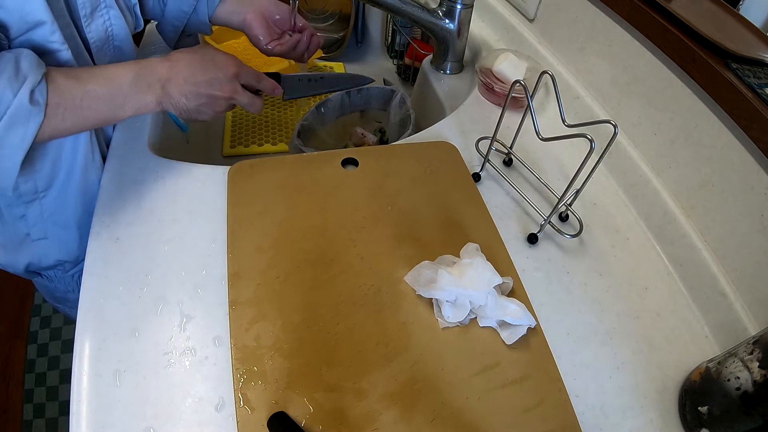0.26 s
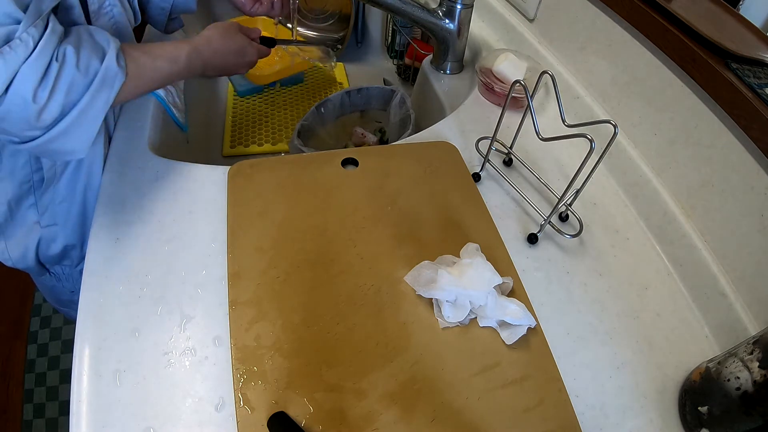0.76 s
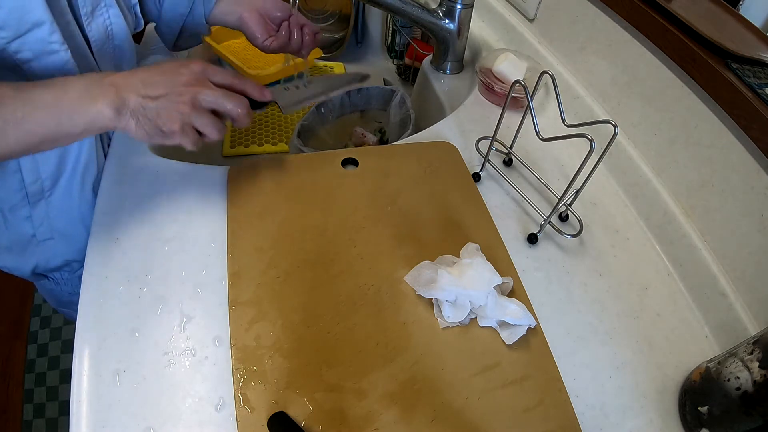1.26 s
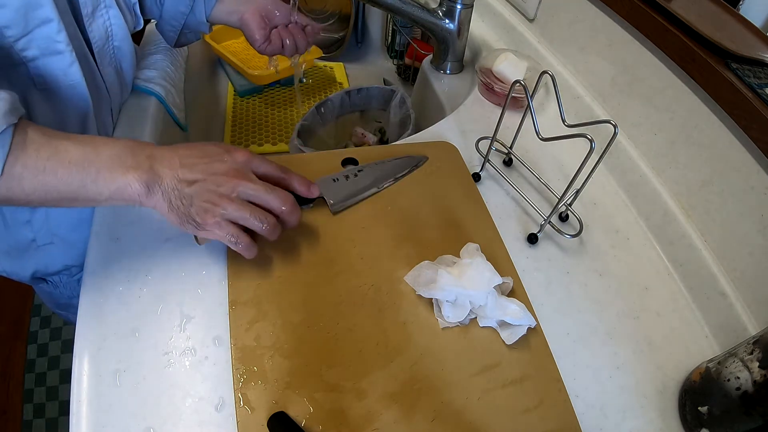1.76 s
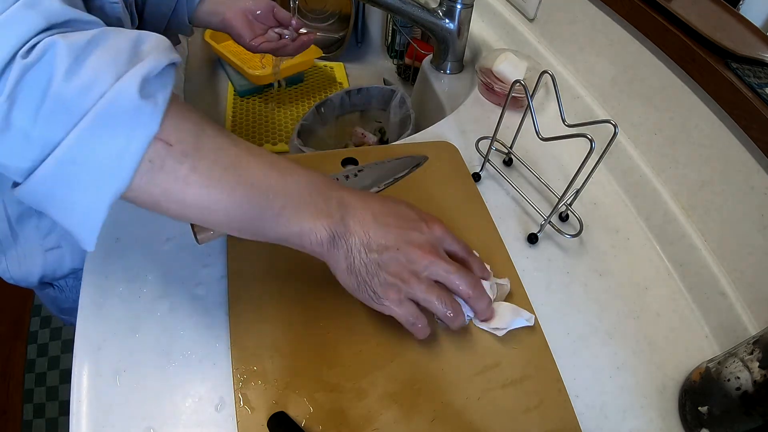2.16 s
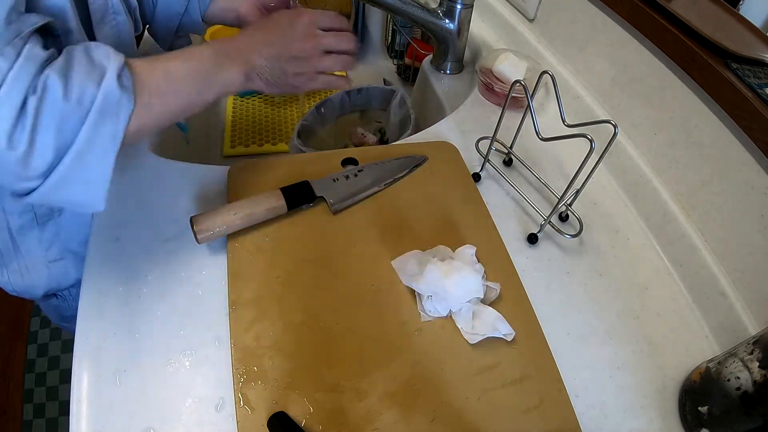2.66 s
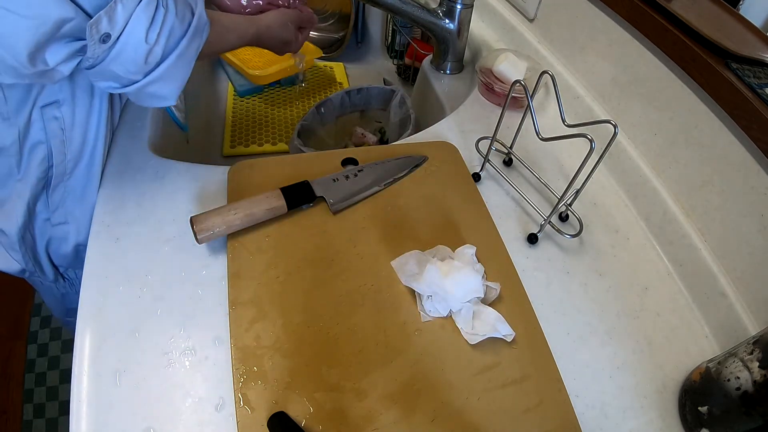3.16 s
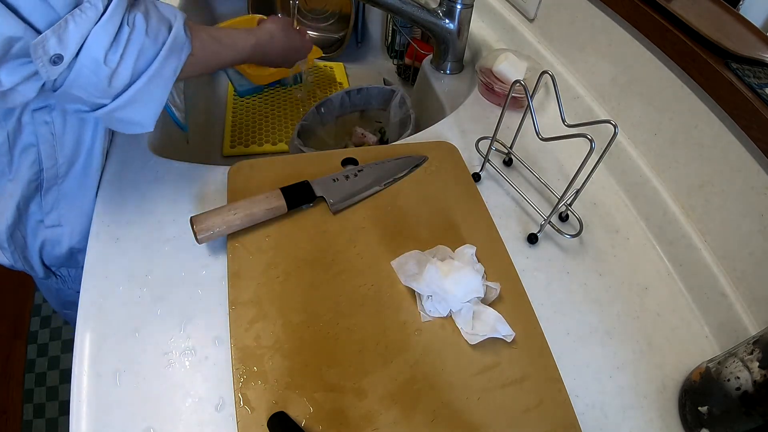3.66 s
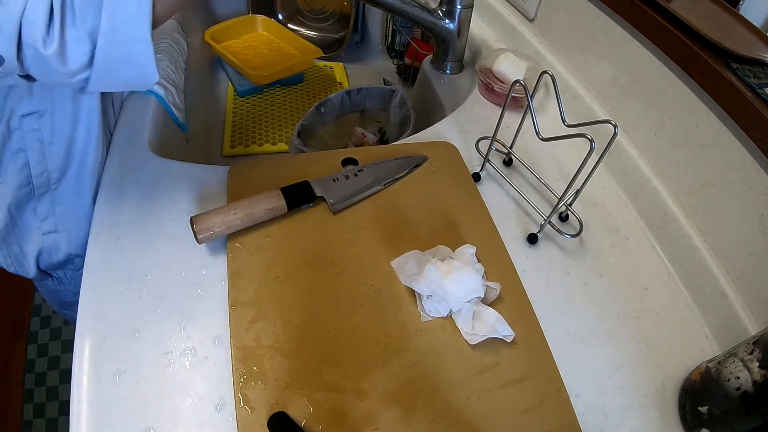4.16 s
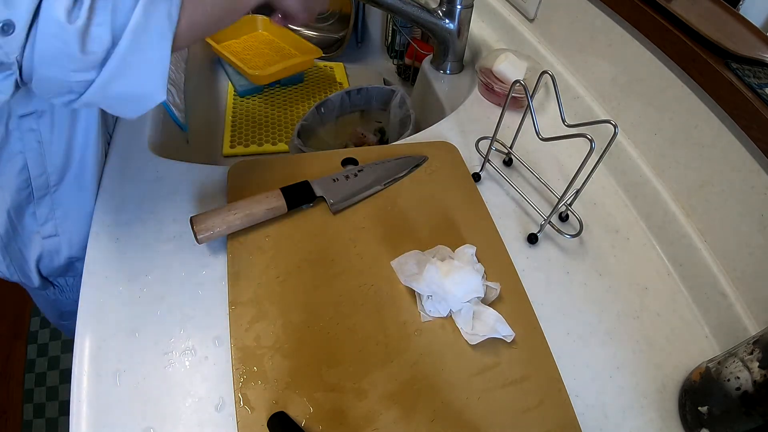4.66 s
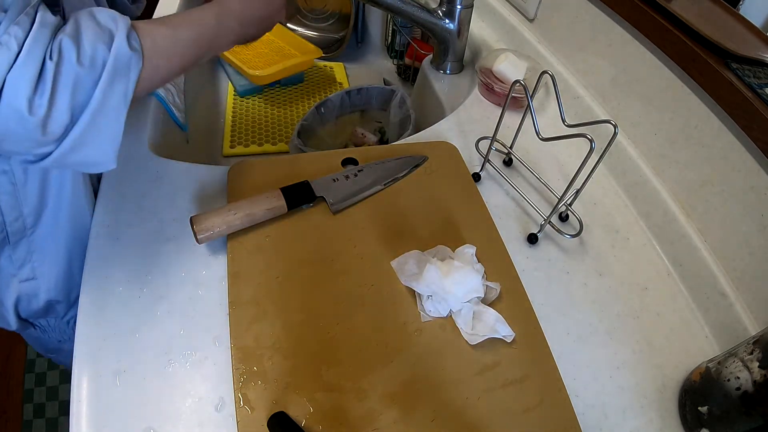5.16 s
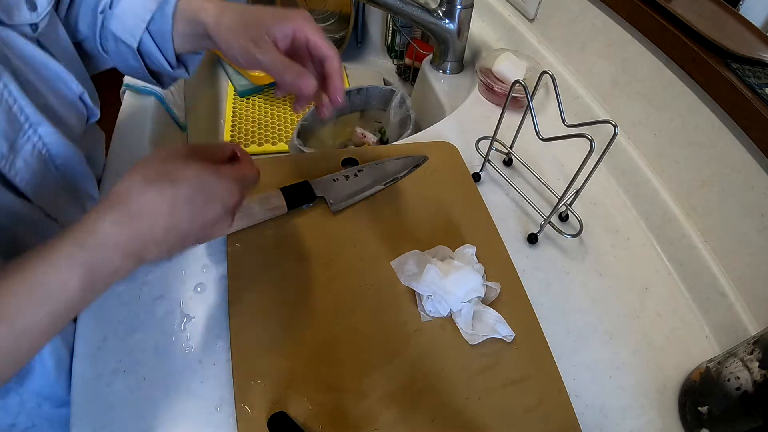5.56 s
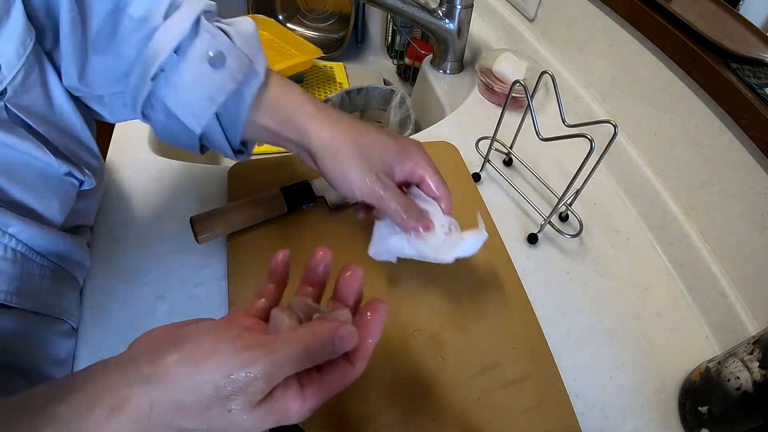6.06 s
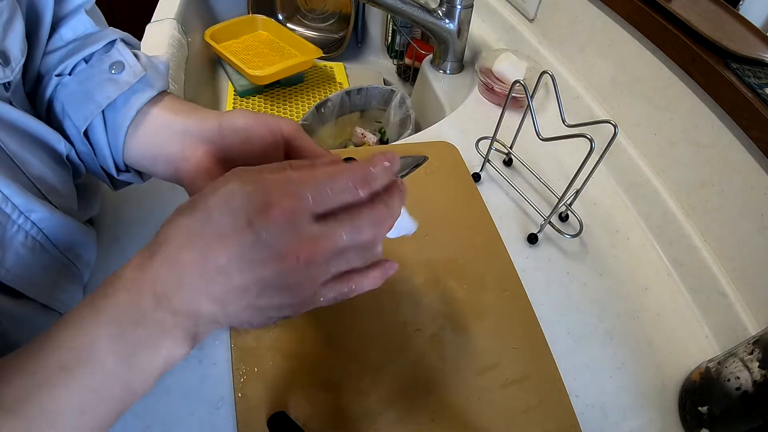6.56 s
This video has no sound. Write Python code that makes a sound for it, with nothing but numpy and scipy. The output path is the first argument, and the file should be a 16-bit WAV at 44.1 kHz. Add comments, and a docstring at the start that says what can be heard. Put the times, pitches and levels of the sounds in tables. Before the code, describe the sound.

Tap water splatters in a sink, a knife knocks down and rocks on a board, the tap shuts with a thud, then wet hands rustle and tap.

```python
"""A tap runs over a knife and hands into a sink: noise grains and bubble pings, filtered by spectra.
The knife is laid on a board and rocks to rest: damped modes. Wet hands then squeak briefly.
The valve sings (narrow noise) and shuts with a clunk and deep thud (low modes); the spout dribbles dry.
Wet hands tap and squeak about the sink, press on the counter and pick up a paper towel in a quiet room.
A limiter ducks the whole mix at loud blows and recovers slowly."""
import sys
import numpy as np
from scipy import signal
from scipy.fft import rfft, irfft
from scipy.io import wavfile
from scipy.ndimage import uniform_filter1d

SR = 44100
rng = np.random.default_rng(int(sys.argv[2]) if len(sys.argv) > 2 else 0)


def store_pcm(level_fs):
    """Save levels as 16-bit WAV."""
    pcm = np.round(np.clip(level_fs, -1, 1) * 32767).astype(np.int16)
    wavfile.write(sys.argv[1], SR, np.atleast_2d(pcm).T)


N = 301197
TIME, BINS = np.arange(N) / SR, np.fft.rfftfreq(8192, 1 / SR)
AGE = TIME[:SR // 2]  # time since the start of a single event
SHUT_S, CLOSE_DB_PER_S = 3.945, 184  # the valve shuts; how fast the flow dies
# spectrum of the drumming sink floor: hz, level_db
DRUM_TONE = [(30, -47), (60, -11), (85, -20.5), (110, -35.5), (150, -2.5), (170, 1.5), (215, -10.5),
             (265, -2.5), (320, -15.5), (450, -17)]


def amp(db):
    """Decibels to gain."""
    return 10 ** (np.asarray(db) / 20)


def unit(x):
    """Scales to rms 1."""
    return x / np.sqrt(np.mean(x ** 2) + 1e-20)


def tone(points):
    """A spectrum in dB on the filter bins, falling 30 dB per octave more beyond its ends."""
    hz, db = np.transpose(points)
    octave, known = np.log2(BINS + 1), np.log2(hz + 1)
    beyond = abs(octave - np.clip(octave, known[0], known[-1]))
    return np.interp(octave, known, db) - 30 * beyond


def colour(x, db, band):
    """Minimum-phase filter that gives unit white noise an rms of 1 inside the band."""
    gain = amp(np.maximum(db - db.max(), -90))
    gain = gain / np.sqrt(np.mean(gain ** 2 * (BINS > band[0]) * (BINS < band[1])))
    log_gain = np.log(np.r_[gain, gain[-2:0:-1]])
    response = np.exp(np.conj(signal.hilbert(log_gain)))
    impulse = np.fft.ifft(response).real[:len(BINS)]
    return signal.oaconvolve(np.atleast_2d(x), impulse[None], axes=1)[:, :N]


def ear_noise(length, same):
    """White noise for two ears; same is the share of power they hear alike."""
    z = rng.standard_normal((3, length))
    return np.sqrt(same) * z[0] + np.sqrt(1 - same) * z[1:]


def burst(lo_hz, hi_hz, same=0.99):
    """Half a second of band noise at rms 1, partly shared by both ears."""
    sos = signal.butter(3, [lo_hz, min(hi_hz, .48 * SR)], "band", fs=SR, output="sos")
    return unit(signal.sosfilt(sos, ear_noise(len(AGE), same)))


def decay(t60_s):
    """Exponential fall of 60 dB in t60_s."""
    return np.exp(-np.log(1000) * AGE / t60_s)


def attack(rise_s):
    """Linear rise from 0 to 1."""
    return np.minimum(AGE / rise_s, 1)


def pan(db):
    """Left and right gains for a left-right level difference; the nearer ear has gain 1."""
    return amp([[min(db, 0)], [min(-db, 0)]])


def add(mix, s, sound):
    """Mixes a sound in at time s."""
    part = mix[:, round(s * SR):][:, :sound.shape[-1]]
    part += sound[..., :part.shape[1]]


def flutter(hz, depth_db):
    """A random gain that wanders mostly below hz, by depth_db rms."""
    lowpass = 1 / (1 + (np.fft.rfftfreq(N, 1 / SR) / hz) ** 4)
    slow = irfft(rfft(rng.standard_normal(N)) * lowpass, N)
    return amp(depth_db * unit(slow))


def held(s, length_s, rise_db_per_s, fall_db_per_s):
    """Gain that climbs to 1 at time s, holds for length_s and dies away."""
    early_s = np.maximum(s - TIME, 0)
    late_s = np.maximum(TIME - s - length_s, 0)
    return amp(-rise_db_per_s * early_s - fall_db_per_s * late_s)


def patter(per_s, spread_db, channels=1):
    """Tiny impacts at random moments, a few much larger than the rest, at rms 1."""
    shape = (channels, N)
    size = amp(spread_db * np.minimum(rng.exponential(1, shape), 5))
    struck = rng.random(shape) < per_s / SR
    return unit(size * rng.standard_normal(shape) * struck)


def bubbles(per_s, spread_db, cycles, lo_hz, hi_hz, count=24):
    """Bubbles burst at random, each a short, slightly rising ping at one of count pitches."""
    out, t = np.zeros(N), AGE[:1500]
    for hz in np.geomspace(lo_hz, hi_hz, count):
        life = t * hz / cycles
        ping = np.sin(2 * np.pi * hz * t * (1 + 0.013 * life)) * np.exp(-life)
        out += unit(signal.oaconvolve(patter(per_s / count, spread_db)[0], ping)[:N])
    return unit(out)


def ringing(modes):
    """One strike on a set of modes, each with a chance strength and phase in either ear."""
    hz, db, t60_s = np.transpose(modes)[:, :, None]
    phase = rng.random((2, len(modes), 1))
    spread_db = 4.6 * rng.standard_normal((2, len(modes), 1))
    ring = (amp(db + spread_db) * np.sin(2 * np.pi * (hz * AGE + phase)) * decay(t60_s)).sum(1)
    return ring / np.sqrt(np.sum(amp(db) ** 2)) * attack(0.00085)


def favoured(modes, hz):
    """The place of contact brings out the modes near hz."""
    boost_db, width = 12.5, 0.2  # width on a natural-log frequency scale
    return [(f, db + boost_db * np.exp(-(np.log(f / hz) / width) ** 2), t60_s) for f, db, t60_s in modes]


def kitchen(x, t60_s, wet_db):
    """Adds the short diffuse echo of a small room."""
    tail = burst(190, 11000, same=1.0) * decay(t60_s) * (AGE > .004)
    tail = tail / np.linalg.norm(tail[0])
    return x + amp(wet_db) * signal.oaconvolve(x, tail, axes=1)[:, :N]


def room_air():
    """The quiet kitchen's steady rush, with a thin high hiss: two filtered noises."""
    # spectrum of the rush: hz, level_db
    room_tone = [(25, 8), (60, 20.5), (100, 11), (170, -3), (260, -7.5), (350, 10.5), (560, -6),
                 (740, 10.5), (1000, -10.5), (1500, -15), (2500, -17), (4500, -4.5), (8000, -16),
                 (11000, -20), (15500, -29)]
    # spectrum of the hiss: hz, level_db
    hiss_tone = [(4500, -35.5), (5500, -4), (6200, 1.5), (6800, -0.5), (7800, -6.5), (9500, -40.5)]
    rush = amp(-77) * colour(ear_noise(N, 0.99), tone(room_tone), (600, 4000))
    hiss = amp(-81.0) * colour(rng.standard_normal((2, N)), tone(hiss_tone), (5000, 8000))
    return rush + hiss * pan(-12.0)


def strokes():
    """Gains of rustling, rubbing and bumping over time: each stroke swells, holds and fades."""
    # strokes of wet hands and paper: start_s, length_s, rustle_db, rub_db, bump_db
    stroke_rows = [(2.442, 0.0083, -87, -60, -66), (4.469, 0.042, -69.5, -61.5, -49),
                   (4.84, 0.2, -73, -59, -57), (5.07, 0.33, -70.5, -65.5, -57),
                   (5.542, 0.063, -66, -60.5, -50), (5.715, 0.06, -66.5, -69, -53),
                   (5.903, 0.16, -64, -61.5, -47.5), (6.292, 0.09, -70, -62.5, -73),
                   (6.561, 0.19, -68.5, -62.5, -57)]
    rise_db_per_s, fall_db_per_s = 217, 138
    shapes = np.array([held(s, length_s, rise_db_per_s, fall_db_per_s) for s, length_s, *_ in stroke_rows])
    return amp(np.array(stroke_rows)[:, 2:]).T @ shapes


def handling():
    """Sleeves and damp paper rustle in fine grains while the hands rub and bump along the counter."""
    # spectrum of the rustle: hz, level_db
    rustle_tone = [(550, 5), (800, 6), (1100, -2), (1600, 1), (2000, -3.5), (2400, -2.5), (2850, -8),
                   (4400, -9), (5200, -5.5), (6400, -1), (8000, -19.5), (11000, -25.5), (15000, -34)]
    # spectrum of the hollow rubbing: hz, level_db
    rub_tone = [(250, -49.5), (380, 0.5), (436, 5.5), (490, -2.5), (600, -8.5), (900, -41)]
    # spectrum of the low bumping: hz, level_db
    bump_tone = [(40, 4), (100, -24), (160, 6), (215, -1.5), (275, 1.5), (350, -17), (600, -28)]
    hands_s, sleeve_db, bump_db = 4.1, -74.5, -56.5  # steady movement from hands_s on
    snaps = amp(-26.5) * patter(120, 6)  # damp paper and skin
    grains = patter(3000, 0.87, channels=2) * flutter(30, 0.93) + snaps
    rustle = colour(grains, tone(rustle_tone), (1200, 4500))
    rub = colour(patter(600, 0.3, channels=2), tone(rub_tone), (350, 600))
    bump = colour(patter(400, 0.48, channels=2), tone(bump_tone), (130, 320)) * pan(-3)
    moving = held(hands_s, 0, 217, 0)
    rustling, rubbing, bumping = strokes()
    out = rustle * np.hypot(rustling, amp(sleeve_db) * moving)
    out = out + rub * rubbing
    out = out + bump * np.hypot(bumping, amp(bump_db) * moving)
    return out * pan(-1.75)


def smacks():
    """A wet fingertip lands with a short, dull slap of band noise."""
    # touch-downs of wet fingers: start_s, level_db
    smack_rows = [(4.793, -55), (4.83, -50), (4.886, -52.5), (5.128, -50), (5.925, -47), (6.0, -54),
                  (6.551, -57.5), (6.653, -47.5), (6.669, -47)]
    out = np.zeros((2, N))
    for s, db in smack_rows:
        add(out, s, amp(db) * burst(700, 1600, same=0.04) * decay(0.027))
    return out


def squeaks():
    """Wet skin sticks and slips: six falling harmonics of a jittering pitch."""
    # squeaks of wet skin: start_s, length_s, level_db, pitch_hz
    squeak_rows = [(2.588, 0.039, -34.5, 439), (2.612, 0.035, -37.5, 423.5), (4.83, 0.024, -41.5, 441),
                   (4.885, 0.03, -34, 437)]
    out = np.zeros((2, N))
    for s, length_s, db, hz in squeak_rows:
        jitter = 1 + 0.093 * burst(29, 158, same=0.94)[0]
        turn = 2 * np.pi * np.cumsum(hz * jitter) / SR
        slips = sum(np.sin(k * turn) * amp(-16 * np.log2(k)) for k in range(1, 7))
        gate = np.clip(np.minimum(AGE / 0.00072, (length_s - AGE) / 0.0043), 0, 1)
        add(out, s, amp(db) * slips * gate * decay(0.16))
    return out


def skitter(ring, count=5):
    """A tap is not one clean contact: a few lighter touches follow and make its ring uneven."""
    within_s, touch_db = 0.025, -15
    out = np.atleast_2d(ring).copy()
    for when, size in rng.random((count, 2)):
        add(out, within_s * when, amp(touch_db) * size * ring)
    return unit(out) * ring.std()


def taps():
    """Light taps ring the hollow sink and its metal, whose ring wavers like a rattle."""
    # taps, levels before fixed offsets: start_s, hollow_db, bright_db, favoured_hz
    tap_rows = [(4.416, -61, -76, 5500), (4.791, -61.5, -64, 4500), (5.051, -63, -54.5, 2620),
                (5.066, -53.5, -61, 3020), (5.146, -50, -52, 5700), (5.239, -55.5, -62, 5870),
                (5.27, -51.5, -54, 3730), (5.515, -76, -68, 2350), (5.546, -59.5, -69, 4270),
                (5.586, -55, -63, 3300), (5.756, -53.5, -63, 2350), (5.925, -56.5, -57.5, 2320),
                (5.988, -62, -57, 2400), (6.045, -52, -61.5, 2400), (6.26, -64.5, -57.5, 2280),
                (6.327, -76, -66.5, 4370), (6.552, -55, -80, 4400), (6.653, -53, -62, 4460),
                (6.711, -56, -64.5, 6000)]
    # modes of the hollow body: pitch_hz, level_db, t60_s
    hollow = [(383, 3.5, 0.086), (437.8, 10.5, 0.17), (472.6, 1.5, 0.21), (767, -11.5, 0.14),
              (852, -5.5, 0.3), (1070, -23, 0.05), (1270, -14.5, 0.29), (1560, -12.5, 0.12)]
    # modes of the bright metal: pitch_hz, level_db, t60_s
    metal = [(2170, -4, 0.06), (2274, 2, 0.14), (2366, 2, 0.076), (2460, -7, 0.05), (2960, -2, 0.1),
             (3078, 3, 0.093), (3400, -7, 0.06), (4200, 2, 0.07), (4550, -2, 0.05), (5060, -3, 0.07),
             (5790, 0, 0.06), (5997, 2.5, 0.11)]
    out = np.zeros((2, N))
    for s, body_db, bright_db, hz in tap_rows:
        tick = (0.78 * burst(0.797 * hz, 1.16 * hz) + 0.74 * burst(2020, 5600)) * decay(0.037)
        rattle = amp(4 * burst(30, 200, same=0.84)[0])  # wavers by 4 dB rms
        bright = (0.74 * rattle * ringing(favoured(metal, hz)) + tick) * attack(0.0031)
        body = amp(body_db + 9.5) * ringing(hollow) * pan(-3)
        add(out, s, body + amp(bright_db + 3.5) * skitter(bright))
    return out


def thuds():
    """The counter sways for a few slow cycles in three partials; the left ear gets it weaker and later."""
    # deep thuds, level before a fixed offset: start_s, level_db, pitch_hz, length_s, t60_s
    thud_rows = [(3.906, -21.5, 66.1, 0.12, 0.98), (3.982, -8.5, 53.3, 0.14, 0.35),
                 (5.892, -8, 51.2, 0.2, 0.62)]
    out = np.zeros((2, N))
    for s, db, hz, length_s, t60_s in thud_rows:
        hold = 0.11 + 0.62 * np.exp(-np.minimum(AGE / length_s, 2) ** 6)
        swell = attack(0.011) * decay(t60_s) * hold
        turn = 2 * np.pi * hz * AGE - np.array([[1.6], [0]])
        sway = np.sin(turn) + amp(-16.5) * np.sin(1.42 * turn) + 0.16 * decay(0.26) * np.sin(3 * turn)
        add(out, s, -amp(db + 4.0) * pan(-14.5) * swell * sway)
    return signal.sosfilt(signal.butter(4, 38, "high", fs=SR, output="sos"), out)


def shudder():
    """The pipe and the sink judder briefly as the valve cuts the flow: low filtered grains."""
    # spectrum of the judder: hz, level_db
    shudder_tone = [(70, -12), (120, -6), (160, 0), (210, -8), (270, -5), (350, -17), (425, -10),
                    (520, -22), (700, -32)]
    # judders: start_s, length_s, level_db
    judder_rows = [(3.893, 0.023, -30), (3.957, 0.029, -41.5), (4.164, 0.034, -53)]
    rise_db_per_s, fall_db_per_s = 900, 207
    judder = colour(patter(700, 1.5, channels=2), tone(shudder_tone), (130, 320))
    strength = sum(amp(db) * held(s, length_s, rise_db_per_s, fall_db_per_s) for s, length_s, db in judder_rows)
    return judder * pan(-11.0) * strength


def pipe():
    """Water hammer knocks the pipe, which hums briefly in its low modes."""
    # blows of the water hammer: start_s, level_db, favoured_hz
    hammer_rows = [(3.901, -14.5, 161), (3.915, -24, 260), (3.973, -33, 410), (4.148, -36, 272)]
    # modes of the pipe: pitch_hz, level_db, t60_s
    pipe_modes = [(162, -1.5, 0.14), (268, 0, 0.29), (421, -2.5, 0.1)]
    out = np.zeros((2, N))
    for s, db, hz in hammer_rows:
        modes = favoured(pipe_modes, hz)
        ring = sum(amp(mode_db) * np.sin(2 * np.pi * f * AGE) * decay(t60_s) for f, mode_db, t60_s in modes)
        add(out, s, amp(db) * pan(-21) * ring / abs(ring).max() * attack(0.005))
    return out


def valve():
    """Squeezed through the closing valve, the water sings in a few narrow, wavering resonances."""
    # resonances of the valve: centre_hz, width_hz, level_db
    resonances = [(3320, 290, 0.5), (6500, 550, -4.5), (8800, 400, -15)]
    sing_s, hold_s, level_db, rise_db_per_s, fall_db_per_s = 3.806, 0.16, -62, 63, 81
    peaks = sum(amp(db) / (1 + (2 * (BINS - hz) / width_hz) ** 2) for hz, width_hz, db in resonances)
    sing = colour(rng.standard_normal(N) * flutter(17, 5.2), 20 * np.log10(peaks), (3000, 7000))
    return amp(level_db) * sing * held(sing_s, hold_s, rise_db_per_s, fall_db_per_s)


def scrapes():
    """The knife shifts on the board; each short slide hums roughly as narrow noise."""
    # slides: start_s, length_s, level_db, centre_hz
    scrape_rows = [(1.556, 0.072, -46, 803), (1.875, 0.013, -50, 640), (1.985, 0.02, -44.5, 487)]
    out = np.zeros((2, N))
    for s, length_s, db, hz in scrape_rows:
        shape = attack(0.0042) * amp(-600 * np.maximum(AGE - length_s, 0))
        add(out, s, amp(db) * burst(0.955 * hz, 1.045 * hz) * shape)
    return out


def clack(hz):
    """A few cycles of wood on board, reaching the left ear a little later."""
    rise_cycles, ring_cycles, lag_cycles = 1.7, 12.3, 0.37
    cycles = hz * AGE
    shape = (1 - np.exp(-(cycles / rise_cycles) ** 2)) * decay(ring_cycles / hz)
    return shape * np.sin(2 * np.pi * (cycles - np.array([[lag_cycles], [0]])))


def blow(soft_hz, ring):
    """Low modes swell and die, their t60 scaled by ring; a soft contact weakens those above soft_hz."""
    # modes of board and counter, t60 at ring 1:
    # pitch_hz, level_db, t60_s, rise_s, left_right_db, left_lag_cycles
    board = [(57.5, -7.5, 0.28, 0.055, -12.5, 0.09), (78, -0.5, 0.092, 0.018, -15, 0.29),
             (149.2, 3, 0.087, 0.016, -13, 0.2), (219.9, 12.5, 0.085, 0.014, -17.5, 0.35),
             (243.8, 7, 0.062, 0.009, -8, 0.24), (278.4, 8, 0.055, 0.018, -9.5, 0.083),
             (436.4, -15, 0.097, 0.0041, -4, 0.34), (519, -13, 0.1, 0.0028, 27.5, 0.42),
             (568, -17, 0.096, 0.0031, 12, 0.34), (657, -19, 0.069, 0.0019, -0.5, 0.11),
             (825, -31.5, 0.19, 0.0053, -2, 0.14), (855, -23, 0.076, 0.0024, -5, 0.18),
             (1115, -20, 0.053, 0.007, 1, 0.44), (1410, -17.5, 0.049, 0.0013, 11.5, 0.32),
             (1640, -23, 0.055, 0.00096, -16, 0.31)]
    out = amp(-34) * pan(-5.0) * burst(110, 1.3 * soft_hz + 150, same=0.24) * decay(0.34 * ring)
    for hz, mode_db, t60_s, rise_s, side_db, lag_cycles in board:
        swing = np.sin(2 * np.pi * (hz * AGE - np.array([[lag_cycles], [0]])))
        swell = (1 - np.exp(-(AGE / rise_s) ** 2)) * decay(t60_s * ring)
        softening = (1 + (hz / soft_hz) ** 3) ** .5
        out = out + pan(side_db) * amp(mode_db) * swing * swell / softening
    return out


def knocks():
    """A blow on board or counter clicks, cracks, clacks and rings its modes."""
    # blows: start_s, level_db, soft_hz, ring_factor, click_db, click_top_hz, clack_db, clack_hz
    knock_rows = [(1.5697, -10.5, 1170, 1.28, -33, 4360, -6, 495),
                  (1.591, -14.5, 600, 0.73, -45, 1900, -22, 520),
                  (1.612, -13, 200, 0.67, -55.5, 1200, -33.5, 800),
                  (1.658, -23, 260, 0.74, -59, 1200, -39, 330),
                  (1.683, -24.5, 189, 1.9, -58, 1200, -42, 370),
                  (1.7235, -0.5, 420, 0.95, -29, 2000, -6.5, 540),
                  (2.179, -5, 200, 0.29, -64, 900, -12.5, 183), (2.1813, 1, 237, 0.32, -50, 1000, -15, 385),
                  (5.786, -28, 190, 0.69, -79, 1500, -50, 430),
                  (5.894, -23.5, 140, 0.75, -77, 1510, -52, 400),
                  (6.551, -39.5, 300, 1.2, -70, 5000, -39, 490),
                  (6.805, -37.5, 197, 0.96, -65, 1520, -56, 400)]
    # modes of the woody crack: pitch_hz, level_db, t60_s
    crack_modes = [(804, 4, 0.076), (907, -0.5, 0.038), (1022, -10, 0.052), (1105, -1, 0.064),
                   (1294, -4, 0.06), (1540, -4.5, 0.055)]
    out = np.zeros((2, N))
    for s, db, soft_hz, ring, click_db, click_hz, clack_db, clack_hz in knock_rows:
        click = burst(410, click_hz, same=0.32) * (decay(0.012) + 0.084 * decay(0.52))
        contact = click + amp(-2.5) * ringing(crack_modes)
        add(out, s, amp(db) * blow(soft_hz, ring) + amp(click_db) * contact + amp(clack_db) * clack(clack_hz))
    return out


def rocking():
    """The knife rocks on the board in quick, even, fading beats of chance strength."""
    from_s, to_s, gap_s = 1.83, 2.07, 0.0555
    first_db, fade_db_per_s, uneven_db = -14, 56, 3
    out = np.zeros((2, N))
    for s in np.arange(from_s, to_s, gap_s):
        db = first_db - fade_db_per_s * (s - from_s) + uneven_db * rng.standard_normal()
        add(out, s, amp(db) * blow(soft_hz=236, ring=0.65))
    return out


def sweeps():
    """Extra dB of spray and drumming over time: a smooth bump as blade or hands pass through the jet."""
    # passes through the jet: middle_s, length_s, spray_db, drum_db
    sweep_rows = [(0.312, 0.2, 2, 3), (0.583, 0.29, 0.5, 6), (0.754, 0.12, 6, 6.5), (1.13, 0.52, 3, 1.5),
                  (1.977, 0.21, 2, 8.5), (2.644, 0.2, 0, 7.5), (2.936, 0.2, 1, 6.5), (3.308, 0.55, 1, 3),
                  (3.67, 0.094, 2, 8.5)]
    s, length_s, spray_db, drum_db = np.transpose(sweep_rows)
    bumps = np.exp(-(2 * (TIME[:, None] - s) / length_s) ** 2)
    return bumps @ spray_db, bumps @ drum_db


def drips():
    """Stray droplets ping in the spray, louder as it is swept; later they tick between the wet fingers."""
    per_s, level_db, spread_db = 67, -61, 2
    lo_hz, hi_hz, t60_s = 2445, 6000, 0.031
    out, t = np.zeros(N + len(AGE)), AGE[:2500]
    for when, pitch, size in rng.random((round(per_s * N / SR), 3)):
        hz, at = lo_hz * (hi_hz / lo_hz) ** pitch, int(when * N)
        ping = np.sin(2 * np.pi * hz * t) * np.exp(-np.log(1000) * t / t60_s)
        out[at:at + len(t)] += amp(spread_db * min(-np.log(1 - size), 3)) * ping
    in_spray = amp(level_db + sweeps()[0]) * held(0, SHUT_S, 0, CLOSE_DB_PER_S)
    on_hands = strokes()[0]
    return out[:N] * (in_spray + on_hands)


def flicks():
    """Last spurts, and water flicked off the fingers: short band noises."""
    # flicks: start_s, length_s (t60 is 4.3 times this), level_db, centre_hz
    flick_rows = [(0.605, 0.019, -47.5, 6800), (0.725, 0.0067, -50, 13200), (0.838, 0.012, -44, 5560),
                  (3.983, 0.062, -52, 5600), (4.048, 0.032, -54, 6250), (4.118, 0.045, -56, 6000),
                  (4.461, 0.047, -65, 7100), (4.505, 0.11, -68.5, 9000), (4.551, 0.022, -47, 6740),
                  (5.065, 0.046, -67, 7300)]
    out = np.zeros((2, N))
    for s, length_s, db, hz in flick_rows:
        add(out, s, amp(db) * burst(0.81 * hz, 1.114 * hz) * attack(0.0011) * decay(4.3 * length_s))
    return out


def splashes(count=16):
    """A drop lands with a bubble's ping and a short fizz, and bursts into a quick shower of fine droplets."""
    # splashes, level before fixed offsets: start_s, level_db, pitch_hz, ping_db (added to level_db)
    splash_rows = [(0.128, -45.5, 5060, 7.5), (0.7447, -41, 5000, -12), (0.765, -49, 5900, 2),
                   (1.1381, -34, 4340, -8), (1.155, -36, 3820, 4), (1.8901, -34, 5050, -4),
                   (1.985, -34.5, 4500, -17), (2.6243, -37.5, 1760, -1), (2.8523, -46, 2145, 5),
                   (2.956, -36.5, 3860, -5), (2.982, -35, 3900, -3), (3.011, -38, 4060, -1),
                   (3.221, -35, 4750, -3), (3.31, -34, 4280, -10), (3.462, -38.5, 4280, 3),
                   (3.6408, -33, 3700, 0.5), (3.679, -38, 3140, -2), (3.757, -43, 4870, 5),
                   (3.929, -36, 3350, -7), (3.9855, -37, 5060, -1), (4.946, -56.5, 4200, 0)]
    out = np.zeros((2, N))
    for s, db, hz, ping_db in splash_rows:
        ping = np.sin(2 * np.pi * hz * AGE * (1 + 0.5 * AGE)) * decay(0.04)
        fizz = burst(0.67 * hz, 1.31 * hz, same=1.0) * (decay(0.017) + 0.41 * decay(0.28))
        add(out, s, amp(db - 5.0) * (amp(ping_db) * ping + 0.42 * fizz) * attack(0.0024))
        for when, pitch, size in rng.random((count, 3)):
            droplet = np.sin(2 * np.pi * hz * (0.55 + .9 * pitch) * AGE) * decay(0.0067)
            add(out, s + 0.045 * when ** 2, amp(db - 3.0 - 10.6 * size - 11.6 * when) * droplet)
    return out


def dribble():
    """After the shut-off, air and water leave the spout in spits: fluttering grains."""
    # spectrum of the splutter: hz, level_db
    splutter_tone = [(2300, -6), (3300, -2), (4200, -6), (6200, 3), (7800, -8), (14000, -23)]
    dry_s, level_db = 4.178, -62
    spits = patter(1800, 1.5, channels=2) * flutter(35, 2.5)
    splutter = colour(spits, tone(splutter_tone), (3000, 8000))
    return splutter * amp(level_db) * held(SHUT_S, dry_s - SHUT_S, CLOSE_DB_PER_S, CLOSE_DB_PER_S)


def free_jet():
    """As the hands withdraw, the jet hits the sink ever harder until the valve shuts: splatter and boom."""
    # spectrum of the splatter: hz, level_db
    splatter_tone = [(400, 11), (900, 0.5), (1500, 3), (2200, 2.5), (3300, 2.5), (4400, -3), (6200, 3.5),
                     (7600, -4.5), (8600, -4.5), (11000, -11.5), (13000, -15), (15700, -25)]
    splatter_db, boom_db, rise_db_per_s = -51.5, -37.5, 46.5
    splatter = colour(patter(5000, 1.2, channels=2) * flutter(40, 0.37), tone(splatter_tone), (5500, 11000))
    boom = colour(patter(1500, 2.2, channels=2), tone(DRUM_TONE), (130, 330)) * pan(-12)  # the whole basin
    strength = held(SHUT_S, 0, rise_db_per_s, CLOSE_DB_PER_S)
    return (boom * amp(boom_db) + splatter * amp(splatter_db)) * strength


def sink_colour():
    """Gain of the sink in dB: its resonances, and random ripple from standing waves between its walls."""
    # resonances of the sink: centre_hz, width_hz, boost_db
    resonances = [(439.6, 30, 10.5), (502, 29, 9), (823, 49, 5.5), (1287, 51, 10.5), (1409, 28, 8),
                  (1450, 41, -4), (1673, 84, 9), (2180, 90, -4), (2490, 54, 5), (2880, 29, 5.5),
                  (3800, 25, 1.5), (4610, 84, 3), (6820, 31, 7), (8810, 610, 5.5)]
    peaks_db = sum(db / (1 + (2 * (BINS - hz) / width_hz) ** 2) for hz, width_hz, db in resonances)
    ripple = unit(uniform_filter1d(rng.standard_normal(len(BINS)), size=9))
    return peaks_db + 1.5 * ripple


def running_water():
    """The stream breaks into drops, spray and bubbles, heard through the sink; its floor drums underneath."""
    # spectrum of the stream's body: hz, level_db
    stream_tone = [(200, -6), (330, 5), (450, 3), (600, 0), (950, -4), (1300, -1), (2100, -1), (3200, -2.5),
                   (4000, -10), (6000, -30)]
    # spectrum of the fine spray: hz, level_db
    spray_tone = [(2600, -24), (3400, -8), (3850, -.5), (4600, 0), (5250, -2.5), (5800, -7), (6700, -9.5),
                  (7400, -15.5), (8000, -19), (8800, -19.5), (10000, -28), (11300, -32), (12300, -21),
                  (13800, -24), (15700, -33)]
    # spectrum of the mist: hz, level_db
    mist_tone = [(8000, -16), (11200, -17), (12400, 0), (13800, -2), (15700, -9)]
    stream_db, spray_db, drum_db = -59.5, -57, -55.5
    body_share = 0.68  # share of the extra spray dB that the body gains
    sink_db = sink_colour()
    gurgle = amp(-17.5) * bubbles(120, 1.8, 11.6, 596, 2605, count=14)  # larger bubbles
    drops = patter(9000, 1.44) * flutter(33, 0.61)
    stream = colour(drops + gurgle, tone(stream_tone) + sink_db, (1000, 3000))
    fizz = patter(7000, 1.8) * flutter(25, .8) + .17 * bubbles(450, 3.2, 16, 2200, 7000)
    # mist reaches each ear separately
    mist = amp(-15.0) * colour(patter(4000, 1.0, channels=2), tone(mist_tone), (11500, 15000))
    spray = colour(fizz, tone(spray_tone) + sink_db, (3700, 6000)) + mist
    drum = colour(patter(1500, 2.55), tone(DRUM_TONE), (130, 330))
    more_spray_db, more_drum_db = sweeps()
    running = stream * amp(stream_db + body_share * more_spray_db)
    running = running + spray * amp(spray_db + more_spray_db)
    running = running + drum * amp(drum_db + more_drum_db)
    return running * held(0, SHUT_S, 0, CLOSE_DB_PER_S)


def scene():
    """Water, blows and handling in the kitchen."""
    on_board = kitchen(knocks() + rocking() + scrapes(), 0.5, -22.5)
    at_sink = kitchen(taps() + squeaks() + smacks() + splashes() + flicks() + drips(), 0.32, -9.5)
    flow = running_water() + free_jet() + dribble() + valve()
    shut_off = shudder() + pipe() + thuds()
    return room_air() + handling() + shut_off + on_board + at_sink + flow


def record(dry):
    """A limiter ducks peaks over its ceiling and recovers slowly; a low-pass then limits the band."""
    ceiling_db, recover_db_per_s, smooth_s, edge_hz = -4.5, 5.5, 0.015, 15720
    over_db = np.maximum(20 * np.log10(abs(dry).max(0) + 1e-9) - ceiling_db, 0)
    recovery_db = recover_db_per_s * TIME
    duck_db = np.maximum.accumulate(over_db + recovery_db) - recovery_db
    limited = dry * amp(-uniform_filter1d(duck_db, round(smooth_s * SR)))
    lowpass = signal.firwin(511, edge_hz, window=("kaiser", 9), fs=SR)
    return signal.oaconvolve(limited, lowpass[None], "same")


dry = scene()
out = record(dry)
store_pcm(out)
```